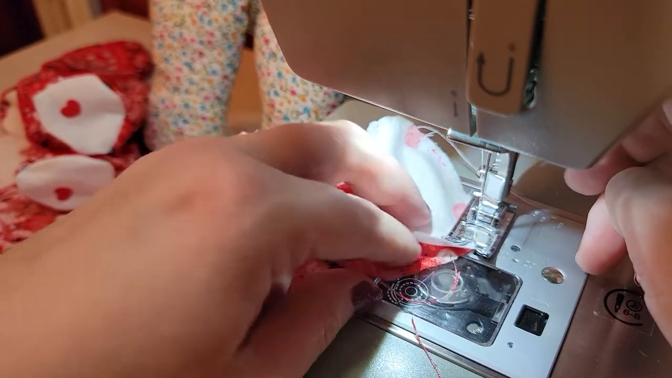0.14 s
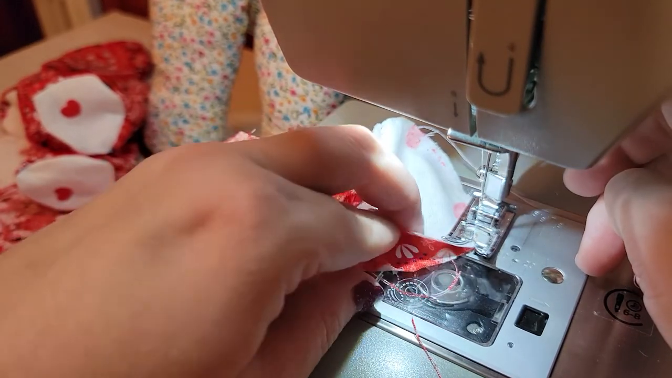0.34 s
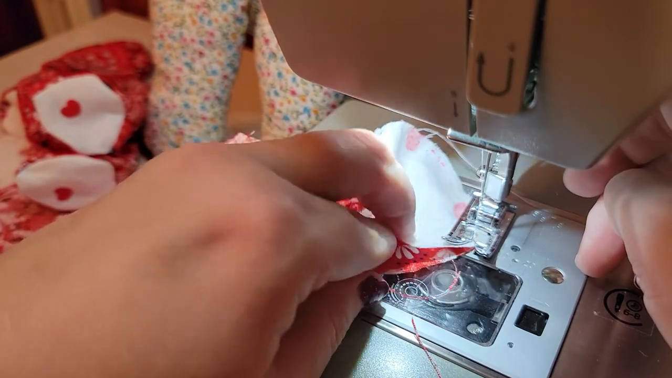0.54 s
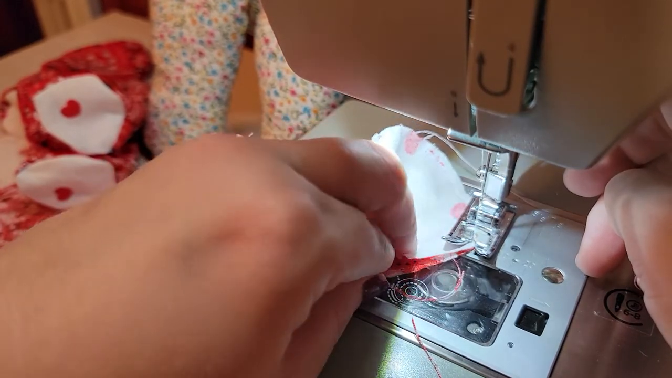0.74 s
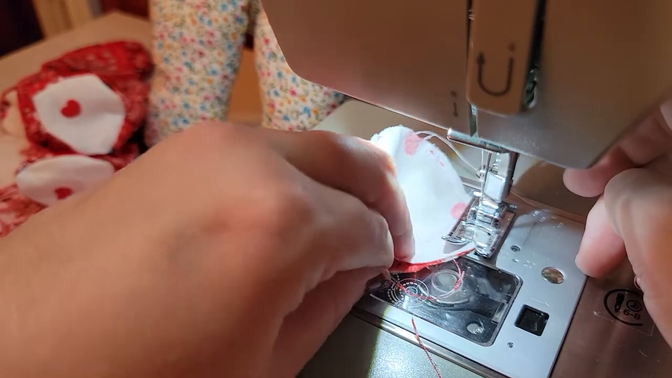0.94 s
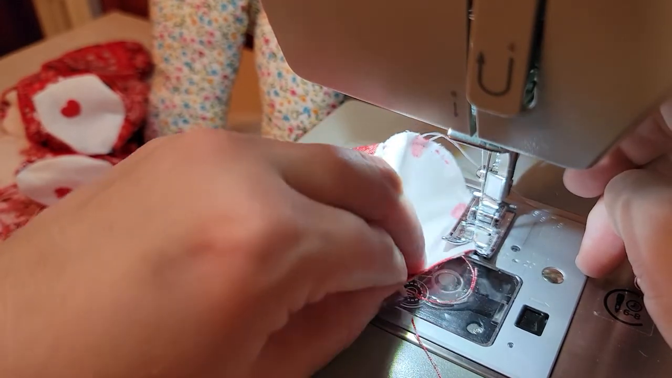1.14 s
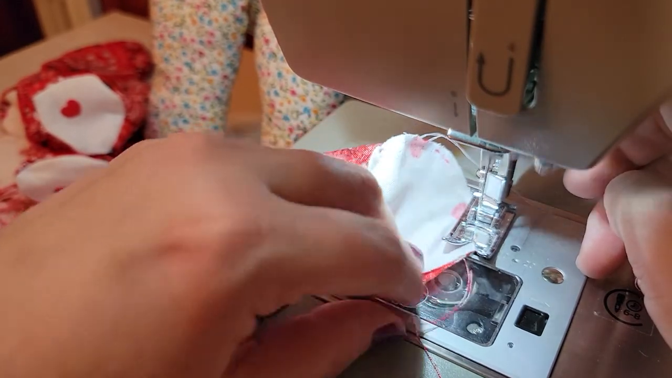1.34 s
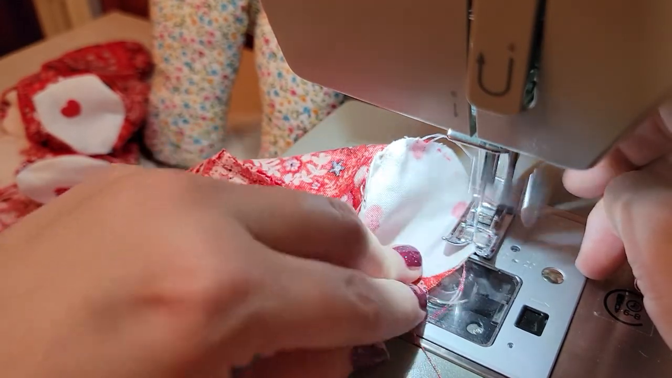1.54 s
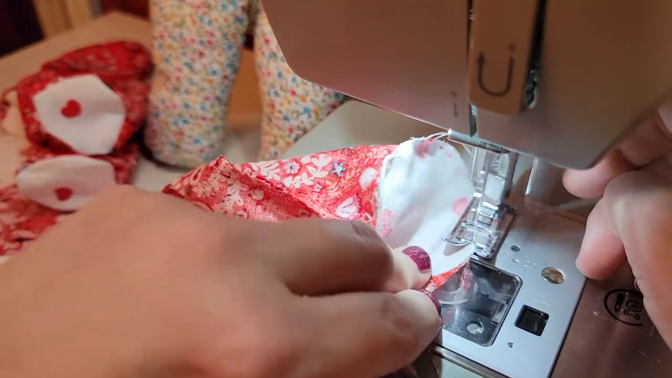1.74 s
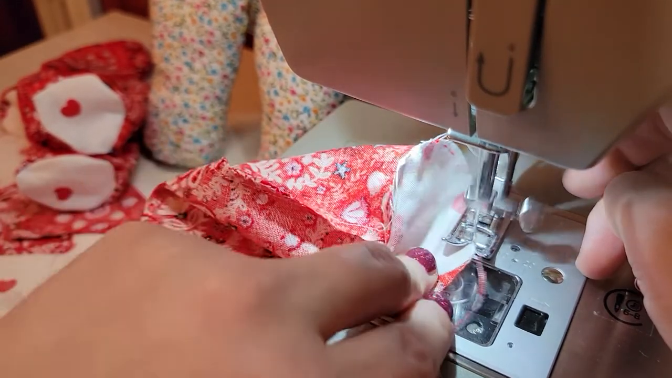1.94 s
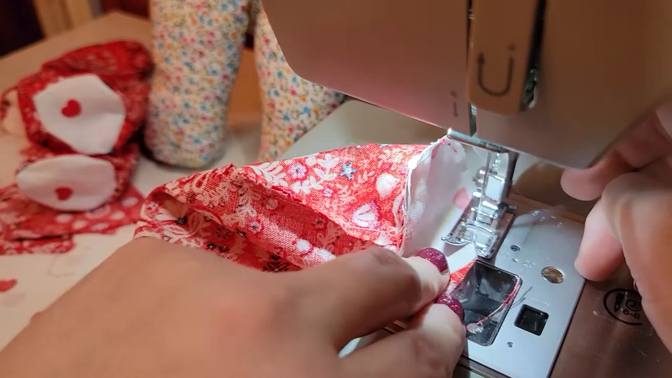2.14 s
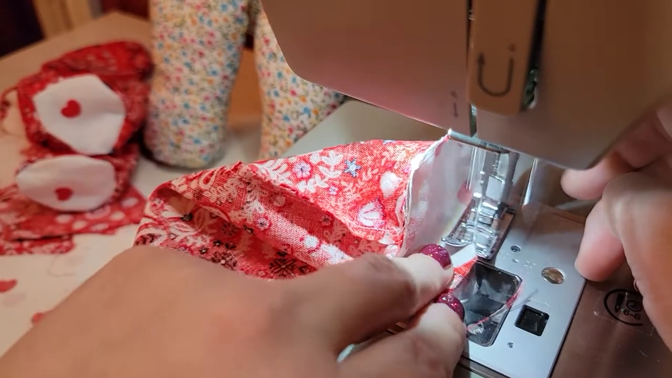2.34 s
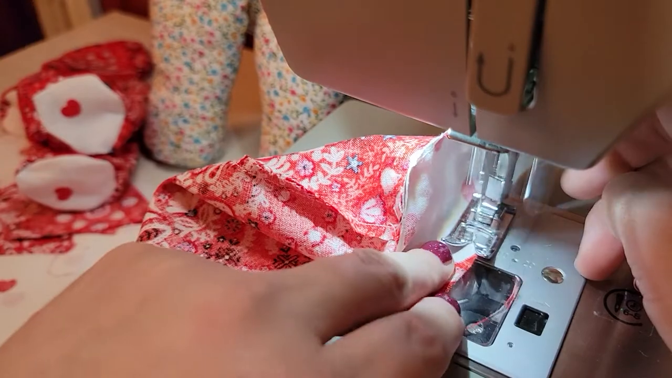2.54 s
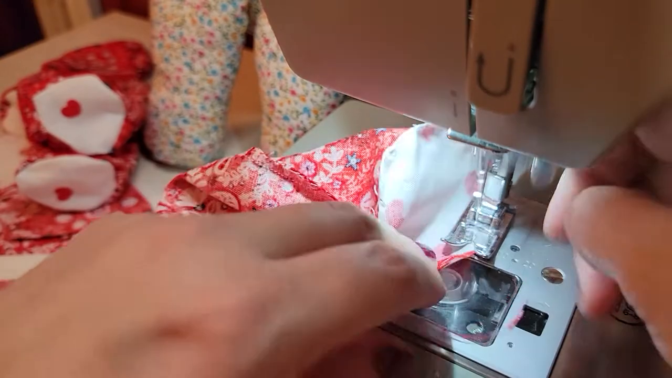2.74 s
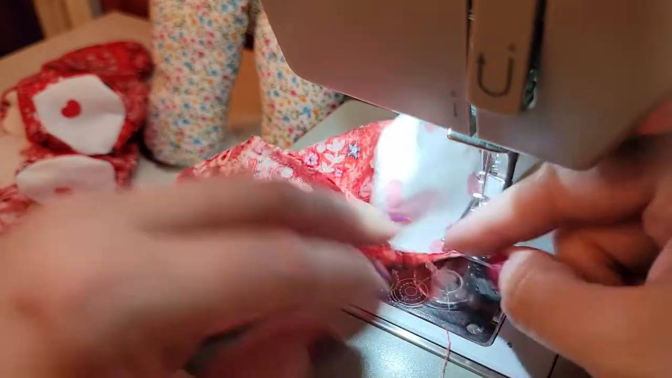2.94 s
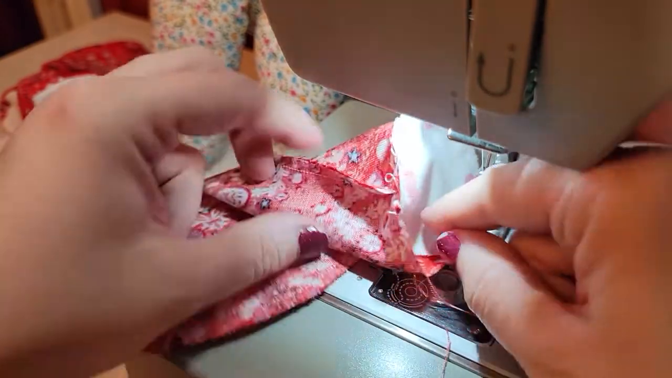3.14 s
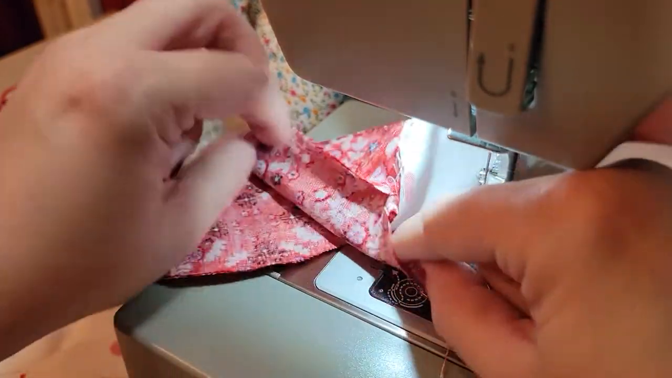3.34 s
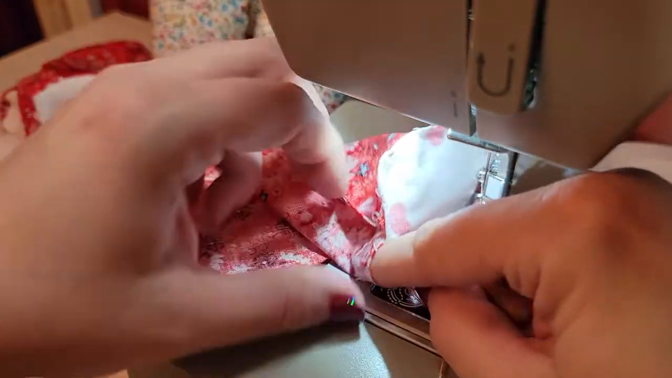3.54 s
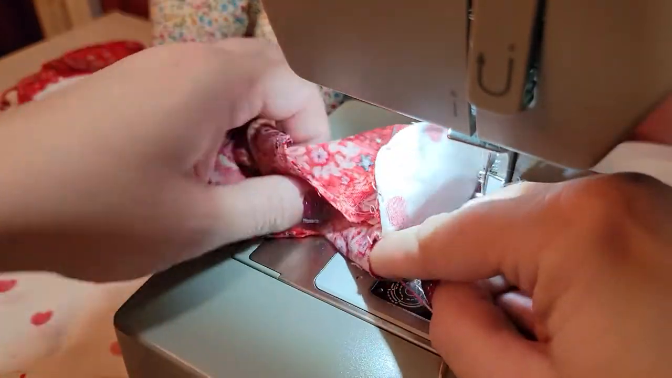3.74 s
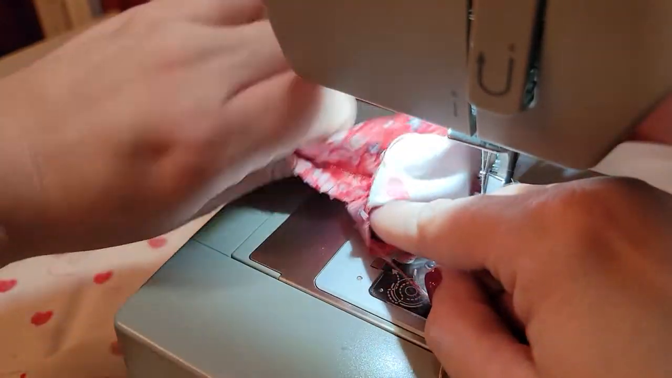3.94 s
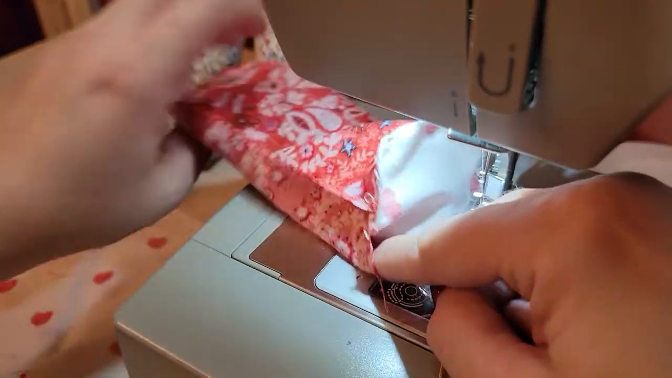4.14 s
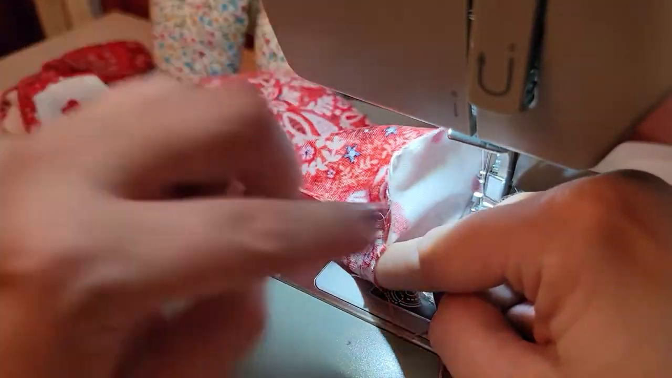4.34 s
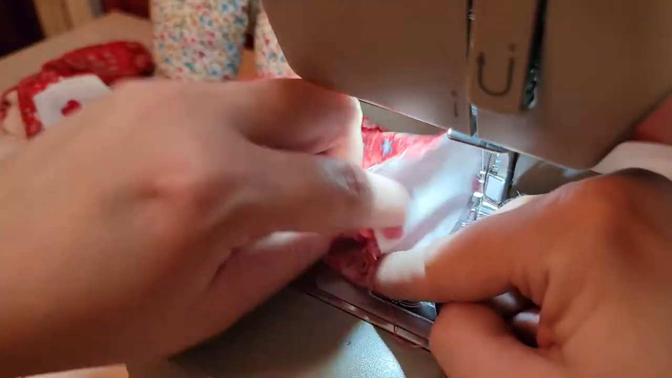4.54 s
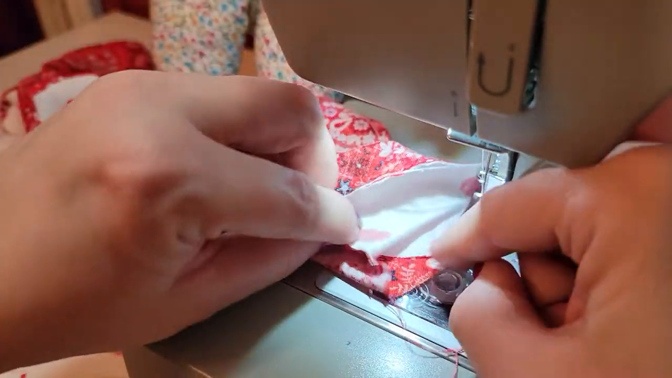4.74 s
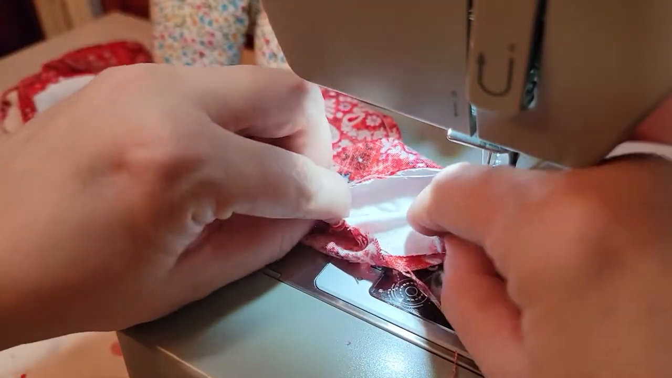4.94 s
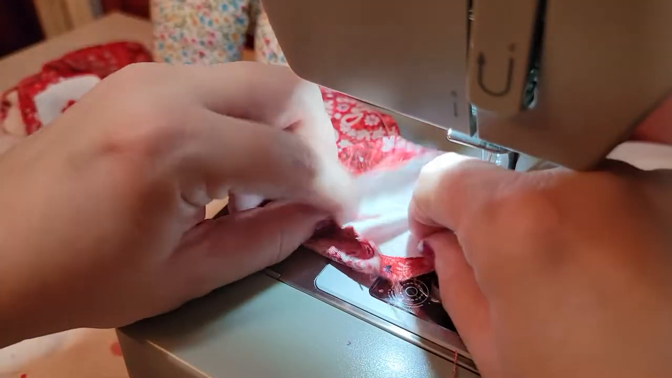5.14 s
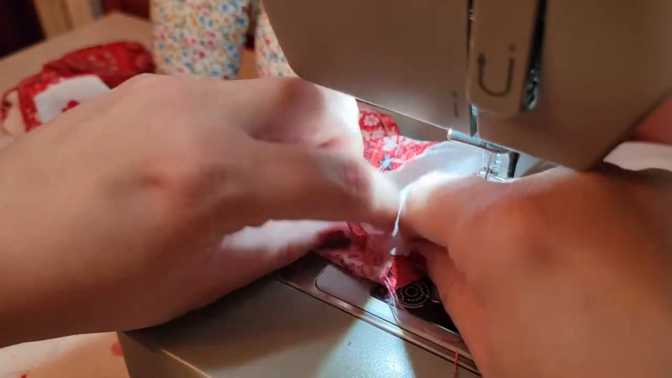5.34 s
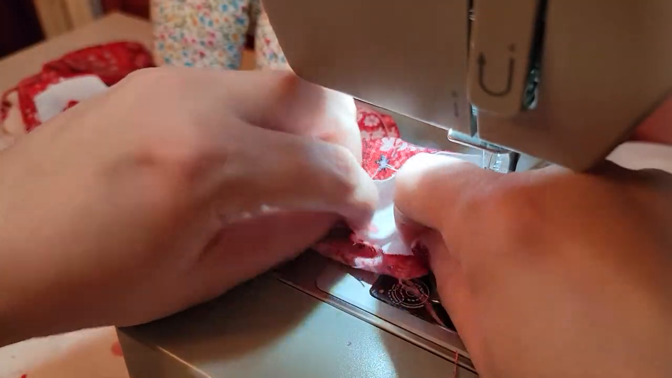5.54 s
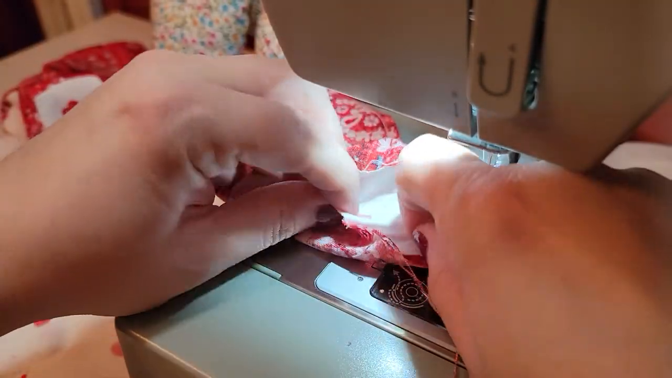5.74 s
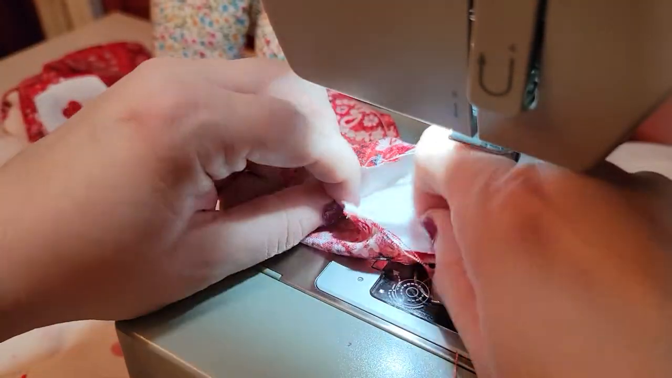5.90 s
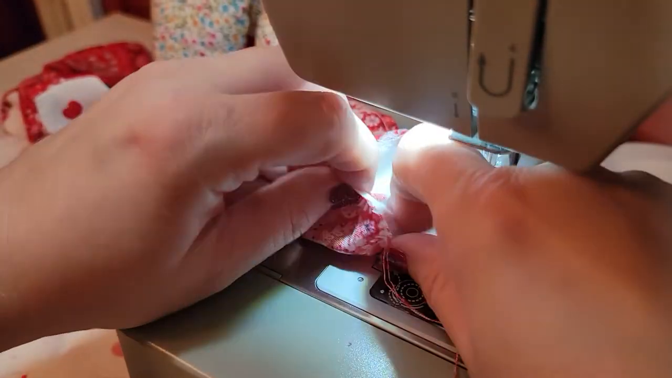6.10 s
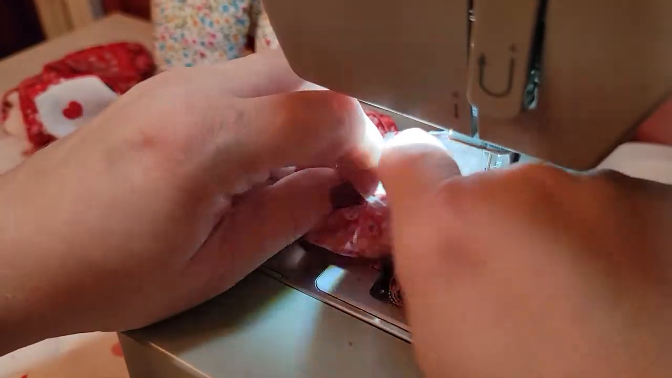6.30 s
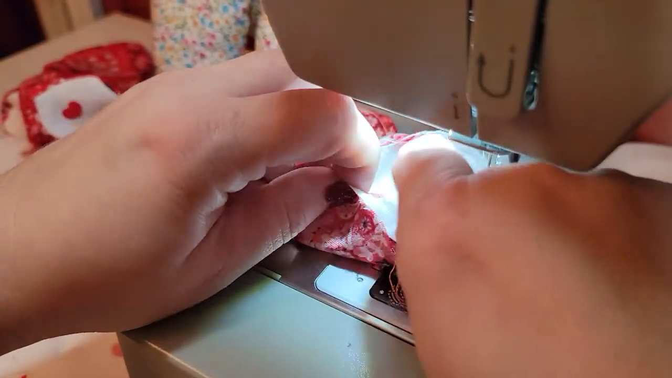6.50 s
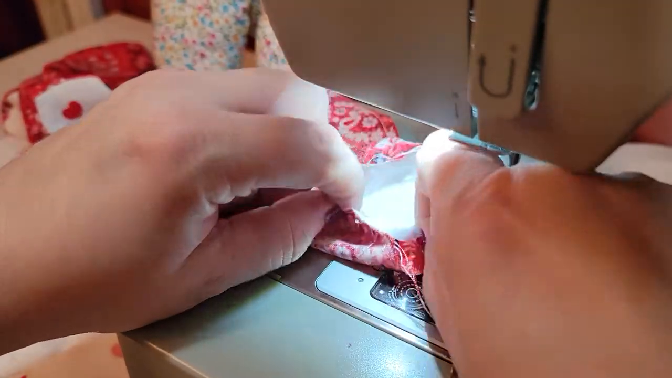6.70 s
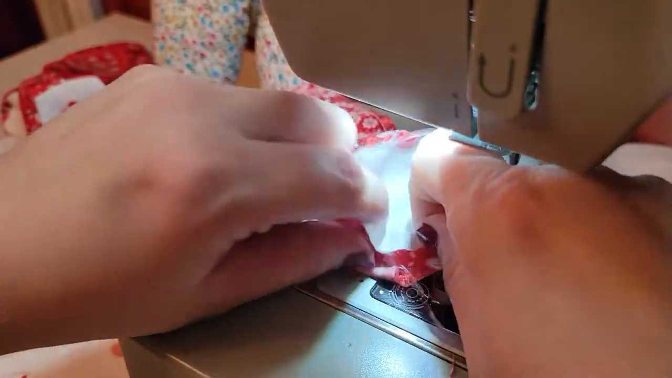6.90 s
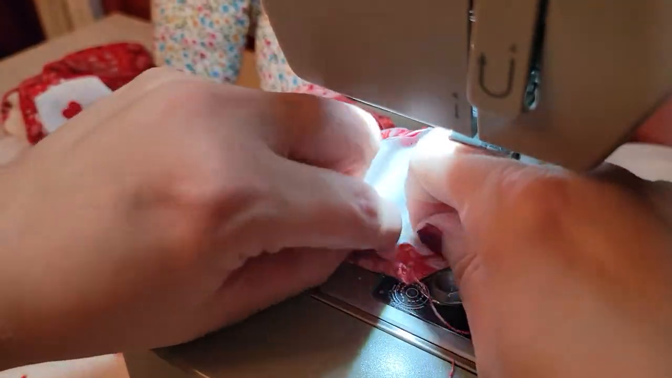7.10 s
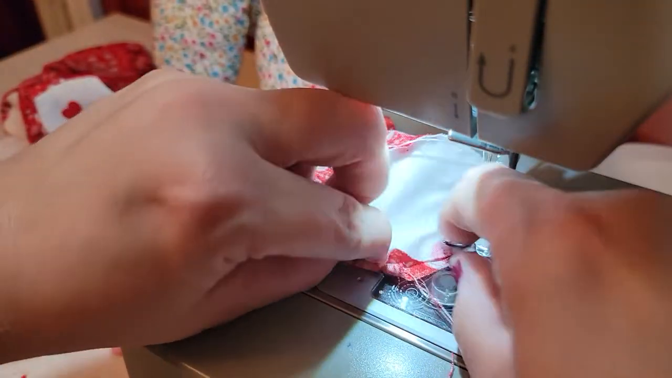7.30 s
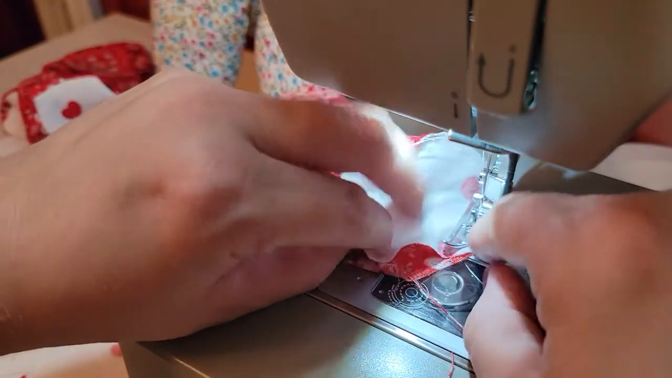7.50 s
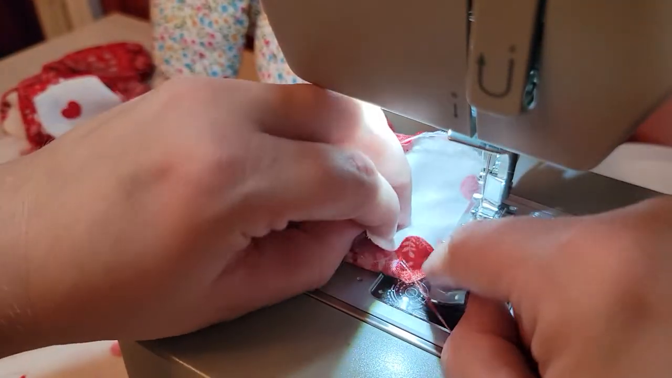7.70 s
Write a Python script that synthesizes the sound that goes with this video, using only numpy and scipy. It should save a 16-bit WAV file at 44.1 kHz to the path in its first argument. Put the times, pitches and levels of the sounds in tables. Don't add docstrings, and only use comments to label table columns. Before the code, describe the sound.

Close up in a quiet, faintly humming room, fingertips rustle and tap fabric on a metal bed. A domestic sewing machine buzzes, catches and races through about a dozen and a half stitches, its whine rising over rapid knocks, then coasts to a stop. The presser lever snaps sharply, and light cloth rustles, nail taps, soft thumps and tiny pin-like ticks continue to the end. A phone on the table picks it up nearby.

```python
import sys
import numpy as np
from scipy import signal
from scipy.fft import rfft, irfft
from scipy.io import wavfile
from scipy.ndimage import uniform_filter1d

SR = 44100
rng = np.random.default_rng(int(sys.argv[2]) if len(sys.argv) > 2 else 0)


def invert_db(level):
    return 10 ** (np.asarray(level, dtype=float) / 20)


def store_pcm(level_fs):
    pcm = np.round(np.clip(level_fs, -1, 1) * 32767).astype(np.int16)
    wavfile.write(sys.argv[1], SR, np.atleast_2d(pcm).T)


N = 346626
T, HZ = np.arange(N) / SR, np.fft.rfftfreq(N, 1 / SR)

# f/Hz, density/dB per Hz
ROOM_SPECTRUM = [(12, -48), (20, -31), (60, 3.5), (89, 7.5), (165, -10.5), (206, -41), (361, -8),
                 (652, -37.5), (750, -19), (1050, -51), (1320, -25.5), (3520, -37), (8410, -48),
                 (14300, -47.5), (16500, -50.5)]
ROOM_DB = -54.5
# start t/s, end t/s, f/Hz, level/dB
WHISTLES = [(.15, .65, 1670, -74), (.95, 1.37, 1690, -68), (.76, .84, 2250, -68), (3.19, 3.33, 2220, -71),
            (4.005, 4.035, 6000, -66), (4.7, 4.8, 3400, -70), (4.01, 4.03, 2100, -62),
            (5.37, 5.46, 2080, -68)]

# peak t/s, swell/s, fade/s, peak level/dB, fine hiss re peak/dB
RUSTLE = [(0.01, .02, 0.091, -73, -9), (0.1, .03, 0.45, -68.5, -15), (0.8, .6, 0.39, -70, -15),
          (1.212, .3, 0.065, -69.5, -5.5), (3.13, .02, 0.2, -61, -25), (3.39, 0.39, 0.16, -60.5, -4),
          (3.809, .25, 0.1, -51.5, -4.5), (4.05, .2, 0.47, -59.5, -5.5), (4.66, 0.1, 0.21, -68, -2.5),
          (4.97, 0.32, 0.068, -68.5, -7), (5.3, 0.45, 1, -70, -11), (6.05, 0.015, 0.14, -76.5, -1.5),
          (6.43, 0.32, 0.058, -69, -2), (7.539, .9, 0.039, -66.5, -9.5), (7.66, 0.18, 0.17, -66, -22)]
SLIDE_SPAN_DB = 20
REST_LOW_DB, REST_MID_DB, LOW_PER_SLIDE = -71, -80.5, .4
# t/s, peak level/dB, f/Hz, bright part re peak/dB, bright f/Hz
TAPS = [(0.091, -41, 371, -8.5, 1180), (0.136, -41, 364, -4, 1410), (0.618, -51, 357, -14, 1140),
        (1.106, -50.5, 826, -14, 1550), (1.19, -51, 450, 4, 1195), (3.098, -38.5, 399, 3.5, 1204),
        (3.402, -48, 472, 0, 1246), (3.64, -42.5, 532, -6, 1630), (3.687, -51.5, 368, 3.5, 1500),
        (5.178, -51.5, 359, 0, 1740), (5.207, -54.5, 382, -12, 2230), (5.261, -47.5, 855, 3.5, 3340),
        (5.893, -37, 347, -20, 1540), (5.984, -45, 358, -12.5, 980), (6.149, -67.5, 426, 11, 1510),
        (6.326, -46, 310, -10, 1296), (6.529, -54.5, 288, -13, 2060), (6.633, -62, 400, -3, 1040),
        (6.718, -57.5, 252, -3.5, 1467), (7.183, -57, 382, -8, 1410), (7.298, -42.5, 369, -9.5, 1230),
        (7.488, -34.5, 561, -6, 1584), (7.54, -63, 358, 4, 1930)]
# t/s, peak level/dB, f/Hz, left minus right/dB
TICKS = [(0.0915, -35.5, 5800, 9), (0.1367, -33, 5650, 11), (1.1918, -55, 5050, 3.0),
         (1.761, -3.5, 4800, 0), (3.1065, -20, 6040, 6), (3.4738, -67, 5040, -0.5),
         (3.5977, -46, 10450, 18), (3.6381, -66, 5110, 11), (4.0774, -31, 12000, 16),
         (4.198, -32, 5960, 13.5), (4.5007, -58.5, 13760, 16), (5.177, -56, 5870, 4),
         (5.2599, -41, 5700, 6), (5.6101, -46, 11080, 2), (5.983, -45, 5000, 17), (6.0414, -44, 12800, 19),
         (7.2995, -51, 5440, 14), (7.4864, -52, 5740, 4.5)]
# t/s, peak level/dB, f/Hz
THUMPS = [(0.488, -55, 364), (0.716, -46, 364), (0.876, -46.5, 337), (1.018, -51, 705), (1.281, -43, 651),
          (3.995, -33.5, 338), (4.057, -43.5, 281), (4.587, -43.5, 282), (4.763, -47.5, 313.6),
          (5.408, -54.5, 354), (6.372, -43.5, 365), (4.17, -56.5, 300), (5.521, -53, 331), (5.76, -48, 393),
          (6.205, -54.5, 650), (6.984, -50, 404), (7.276, -46.5, 365), (7.621, -50, 397), (7.68, -49, 530)]
THUMP_PAN_DB, TAP_PAN_DB, LEVER_PAN_DB = -5.5, -2.5, -4
# start t/s, end t/s, low level/dB, middle level/dB
RUBS = [(0.736, 0.844, -56.5, -78), (3.982, 4.025, -48, -79), (4.847, 4.912, -55.5, -73.5),
        (5.593, 5.718, -50.5, -65.5), (5.765, 5.815, -68, -90), (6.377, 6.475, -51.5, -66),
        (7.305, 7.41, -69.5, -73)]
# t/s, peak level/dB
LEVER = [
    (3.783, -24),
    (3.795, -12),
]
# f/Hz, level/dB, t60/s
LEVER_MODES = [(146.4, -7, 0.25), (368, 1.5, 0.14), (1082, -10.5, 0.1), (1550, -1, 0.092),
               (1780, -21, 0.16), (2210, -24.5, 0.17), (2410, -23, 0.18), (2520, -17, 0.13),
               (2730, -20.5, 0.18), (3024, -8.5, 0.083), (3671, -15, 0.08), (4350, -75, 0.22)]

# t/s, level/dB
DRIVE = [
    (1.262, -36),
    (1.282, -19.5),
    (1.372, -17),
    (1.5, -1),
    (2.64, 0),
    (2.904, -6.5),
    (3.074, -20),
    (3.126, -21.5),
    (3.17, -45),
]
# t/s, tooth rate f/Hz, motor effort level/dB
WHINE = [
    (1.47, 304.6, 3.5),
    (1.604, 611.3, 2),
    (1.778, 850, -0.5),
    (1.982, 980.6, 6),
    (2.372, 1043, 0.5),
    (2.59, 1061, 0.5),
    (2.764, 648, 1),
    (2.956, 311, -4.5),
    (3.03, 262.4, -0.5),
]
# multiple, level/dB
TOOTH_ORDERS = [(1, -15.5), (2, -30.5), (2.39, -31), (3, -31.5), (4, -30)]
# f/Hz, width/Hz, level/dB
OUTLETS = [(345, 150, -8), (590, 230, -10), (780, 170, 0), (900, 110, -7), (2050, 280, .5), (2430, 200, -6),
           (2900, 600, -11), (3600, 800, 1), (4200, 600, -3)]
# needle t/s, peak level/dB, feed t/s, peak level/dB
STITCH = [(1.31, -30.5, 1.402, -27), (1.491, -14, 1.573, -18.5), (1.627, -14.5, 1.713, -10.5),
          (1.763, -16, 1.81, -31.5), (1.87, -14.5, 1.906, -13.5), (1.96, -10.5, 1.994, -19),
          (2.049, -15, 2.083, -10.5), (2.135, -9, 2.166, -16), (2.217, -12.5, 2.25, -11.5),
          (2.301, -10, 2.332, -11.5), (2.383, -9, 2.416, -13.5), (2.466, -10, 2.498, -14),
          (2.546, -16, 2.576, -12.5), (2.631, -27.5, 2.686, -17.5), (2.735, -30.5, 2.809, -22.5),
          (2.872, -26.5, 2.903, -19.5)]
# share of turn, width/turn, thread drag/dB, casing rattle/dB, belt load/dB
DRAG = [
    (0, .05, 7.5, 2, -14.5),
    (.45, 0.055, -3, 3.5, -11),
    (.62, 0.072, 6, 1.5, -0.5),
    (.78, .035, 8, -3.5, 3),
    (0.881, .05, 4.5, 3.5, -3),
]
DRAG_DB, RATTLE_DB, LOAD_DB = -4.5, -2, 3.5
# full-speed level/dB, dB per dB of drive, dB per dB of speed
FOLLOWS = [
    (-30.5, 1, 0.82),
    (-23.5, 1, 0.32),
    (-23.5, 1.29, .5),
    (-39, 0.74, 1.09),
]
# f/Hz, width/Hz, level/dB
CASING = [(277, 18, -7.5), (382, 22, 5), (531.5, 9.6, -2), (630, 11, -9), (784, 56, -3), (860, 90, -7.5)]
# f/Hz, density/dB per Hz
GRIND = [(590, -30.5), (1000, 0), (1310, 0), (1430, -3.5), (1640, -4.5), (2070, -3.5), (2230, -7),
         (2650, -8.5), (3910, -4), (5400, -18.5), (6000, -25.5), (7800, -48), (13200, -120)]
# f/Hz, density/dB per Hz
HISS = [(2940, -35), (5000, -4), (6580, -8), (7490, -4.5), (8970, -13.5), (10600, -10.5), (15200, -5.5),
        (16100, -9), (16500, -57)]
TUG_HZ, TABLE_HZ = 119.3, 107.3
FULL_HZ, REST_S = 1050, 3.16
KNOCK_HZ, KNOCK_RISE_HZ, KNOCK_SCATTER = 556, 300, 0.022
NEEDLE_CLATTER_DB, FEED_CLATTER_DB, CLATTER_PER_SPEED = -5.5, -14.5, 1.5
STOP_S, STOP_DB, STOP_T60_S = 3.095, -26.5, 0.098
TURNS_S, BREAKAWAY_S, HELD_DB = 1.48, 0.089, -15

# f/Hz, left minus right/dB
TILT = [(60, -1.0), (110, 0.11), (200, -2.0), (380, -5.0), (700, -8.5), (1290, -3.5), (2380, -3.5),
        (4400, -3.5), (8120, 1.49), (15000, -2.0)]
HANDS_TILT = [(150, -0.5), (400, 0.58)]  # f/Hz, left minus right/dB
# f/Hz, lead/rad
LEAD = [(60, .1), (170, .05), (330, -1.7), (1000, -1.9), (2000, -4.7), (5000, -11.5), (16000, -20)]
# f/Hz, share 0-1
SHARED = [(60, 0.83), (150, .9), (300, 0.068), (1000, 0.11), (6000, 0.11), (16000, 0.27)]
TOP_HZ = 16050


def shape(table):
    hz, value = np.transpose(table)
    return np.interp(np.log(HZ + 1), np.log(hz), value)


def unit(x):
    return x / np.sqrt(np.mean(x ** 2))


def band(lo_hz, hi_hz):
    return 1 / np.sqrt((1 + (lo_hz / (HZ + 1)) ** 6) * (1 + (HZ / hi_hz) ** 6))


def peak(hz, width_hz):
    return 1 / np.sqrt(1 + (2 * (HZ - hz) / width_hz) ** 2)


def noise(gain):
    both, own = rfft(rng.standard_normal((2, N)))
    shared = np.clip(shape(SHARED), 0, 1)
    left = shared * both + np.sqrt(1 - shared ** 2) * own
    return unit(irfft(gain * np.array([left, both]), N))


def walk(rate_hz):
    k = int(SR / rate_hz)
    held = np.repeat(rng.standard_normal(N // k + 1), k)
    return 1.46 * uniform_filter1d(uniform_filter1d(held, k), k)[:N]


def strike(s, t60_s, rise_s=.001):
    t = np.clip(T[:SR // 4] - s, 0, None)
    return (1 - np.exp(-t / rise_s)) * np.exp(-np.log(1000) * t / t60_s)


def ring(hz, t60_s, rough, rise_s=0.00044):
    t = T[:SR // 4]
    jitter = uniform_filter1d(rng.standard_normal((2, len(t))), size=40)
    both, own = np.cumsum(jitter, axis=1) * rough
    phase = 2 * np.pi * hz * t + np.array([both + 0.6 * own, both])
    return np.sin(phase) * strike(0, t60_s, rise_s)


def burst(source, s, t60_s, rise_s=0.0002):
    piece = source[:, (int(s * SR) + np.arange(SR // 4)) % N]
    return piece * strike(0, t60_s, rise_s) / 2


def add(out, s, db, sound, pan_db=0):
    i = int(s * SR)
    sound = sound[..., :N - i]
    out[:, i:i + sound.shape[-1]] += sound * invert_db(db + np.array([[pan_db], [-pan_db]]) / 2)


def room():
    out = invert_db(ROOM_DB + 0.68 * walk(4)) * noise(invert_db(shape(ROOM_SPECTRUM)))
    for t0, t1, hz, db in WHISTLES:
        gate = np.clip(np.minimum(T - t0, t1 - T) / .02, 0, 1)
        out += gate * invert_db(db) * noise(peak(hz, .08 * hz) ** 2)
    return out


def crackle(rate_hz, spread_db):
    size_db = spread_db * np.minimum(rng.exponential(size=N), 3)
    hits = (rng.random(N) < rate_hz / SR) * invert_db(size_db)
    return unit(1.3 + signal.lfilter([1], [1, -.994], hits))


def slides():
    mid, fine = invert_db(REST_MID_DB) + 0 * T, 0
    for s, swell_s, fade_s, db, fine_db in RUSTLE:
        away_db = SLIDE_SPAN_DB * np.maximum((s - T) / swell_s, (T - s) / fade_s)
        mid = mid + invert_db(db - away_db)
        fine = fine + invert_db(db + fine_db - 1.5 * away_db)
    low = invert_db(REST_LOW_DB) * (mid / invert_db(REST_MID_DB)) ** LOW_PER_SLIDE
    return low, mid, fine


def rustle(low, mid):
    fine = noise(band(4500, 8300) + band(22000, 24000))
    low_gain, mid_gain, fine_gain = slides()
    grain = walk(30)
    out = low_gain * invert_db(-1.0 + 3.2 * grain + 2.5 * walk(45)) * low
    out += mid_gain * invert_db(-5.0 + 1.1 * grain + 0.58 * walk(98)) * crackle(140, 4.3) * mid
    out += fine_gain * invert_db(5.0 + 1.1 * walk(60)) * crackle(120, 3.5) * fine
    return out


def taps(out, low, mid):
    for s, db, hz, rel_db, bright_hz in TAPS:
        body = ring(hz, 0.115, 0.062) + 1.07 * burst(low, s, 0.105)
        bright = burst(mid, s, 0.055, rise_s=0.00045) + ring(bright_hz, 0.032, 0.22)
        add(out, s, db + 1.0, body, TAP_PAN_DB)
        add(out, s, db + rel_db + 5.5, bright, TAP_PAN_DB)


def ticks(out, air):
    for s, db, hz, pan_db in TICKS:
        snap = 0.55 * ring(hz, 0.012, 0.1, rise_s=.0002) + burst(air, s, 0.014)
        add(out, s, db - 12.5, snap, pan_db)


def thumps(out, low, mid):
    for s, db, hz in THUMPS:
        thump = ring(hz, 0.15, .06) + 0.6 * burst(low, s, 0.055) + 0.041 * burst(mid, s, .05)
        add(out, s, db + 1.5, thump, THUMP_PAN_DB)


def rubs(out, low, mid):
    for t0, t1, low_db, mid_db in RUBS:
        swell = np.sin(np.pi * np.clip((T - t0) / (t1 - t0), 0, 1)) * invert_db(2.0 * walk(70))
        out += swell * (invert_db(low_db) * low + invert_db(mid_db) * mid)


def lever(out, low, mid, air):
    for s, db in LEVER:
        modes = sum(invert_db(g) * ring(hz, t60_s, 0.041, rise_s=0.0033) for hz, g, t60_s in LEVER_MODES)
        clack = burst(mid + .3 * air + 1.24 * low, s, 0.044, rise_s=0.00069)
        tail = 0.18 * burst(mid + 0.086 * air, s, .18)
        add(out, s, db - 6.0, modes, LEVER_PAN_DB)
        add(out, s, db - 4.5, clack + tail, LEVER_PAN_DB)


def hands():
    low = noise(0.76 * peak(180, 25) + peak(350, 80) + 0.62 * band(380, 820))
    weave = peak(1300, 550) ** 2 + peak(2100, 520) ** 2 + 0.8 * peak(3400, 820) ** 2
    mid = noise(weave + 0.55 * peak(4400, 490) ** 2 + 0.058)
    air = noise(band(2600, 16000))
    out = rustle(low, mid)
    taps(out, low, mid)
    ticks(out, air)
    thumps(out, low, mid)
    rubs(out, low, mid)
    lever(out, low, mid, air)
    return out


def speed_db(s):
    when, hz, _ = np.transpose(WHINE)
    return 20 * np.log10(np.interp(s, when, hz) / FULL_HZ)


def motor_hum(gain, stall, tug):
    table = noise(peak(TABLE_HZ, 27) * band(66, 150))
    return gain * (2.4 * stall * tug + (1.1 - 0.39 * stall) * table)


def casing_rattle(gain, rattle_db, stall, tug):
    shell = sum(invert_db(db) * peak(hz, w_hz) for hz, w_hz, db in CASING) * band(150, 900)
    out = gain * invert_db(3.0 + rattle_db + 0.69 * walk(45)) * (1 - .5 * stall) * noise(shell)
    once = np.diff(np.sign(tug + 1e-9), prepend=1).clip(0)
    jolts = rfft(once * invert_db(4.5 * rng.standard_normal(N)))
    buzz = unit(irfft(jolts * (peak(370, 40) + 1.83 * peak(650, 90)) ** 2, N))
    return out + gain * 1.2 * stall * buzz


def brushes():
    gate = np.clip(np.minimum((T - 1.27) / 0.0088, (1.44 - T) / 0.1), 0, 1)
    fizz = (peak(2600, 110) + 0.6 * peak(3130, 150) + 0.5 * peak(2300, 110)) ** 2
    return invert_db(-57) * gate * noise(fizz)


def knocks(out, gears, thread):
    blows = [(s, db, NEEDLE_CLATTER_DB) for s, db, _, _ in STITCH]
    blows += [(s, db, FEED_CLATTER_DB) for _, _, s, db in STITCH]
    clatter = gears + 0.22 * thread
    for (s, db, clatter_db), chance in zip(blows, rng.standard_normal(len(blows))):
        hz = (KNOCK_HZ + KNOCK_RISE_HZ * invert_db(speed_db(s))) * (1 + KNOCK_SCATTER * chance)
        rel_db = clatter_db + CLATTER_PER_SPEED * speed_db(s)
        add(out, s, db + 5, ring(hz, 0.028, 0.09, rise_s=0.00079))
        add(out, s + .003, db - 2.5, ring(385., .08, .05, rise_s=0.006))
        add(out, s, db + rel_db + 1.0, burst(clatter, s, 0.026, rise_s=0.00074))


def whine(load_db, drive_db):
    s, hz, effort_db = np.transpose(WHINE)
    rate_hz = np.interp(T, s, hz)
    turn = 2 * np.pi * np.cumsum(rate_hz * (1 + .0022 * walk(50))) / SR
    out = 0
    for k, db in TOOTH_ORDERS:
        way_out = sum(invert_db(g) / (1 + (2 * (k * rate_hz - f) / w) ** 2) ** 2 for f, w, g in OUTLETS)
        swing = .9 if k == 2 else .4
        flutter = walk(35) + .5 * np.array([walk(30), walk(30)])
        flutter_db = (2.1 if k in (1, 4) else 3) * flutter
        order_db = db + (k > 1) * .33 * k * drive_db + swing * load_db + flutter_db
        out = out + way_out * invert_db(order_db) * np.sin(k * turn)
    slack = np.clip((s[-1] - T) / 0.067, 0, 1)
    effort = invert_db(np.interp(T, s, np.clip(effort_db, -30, 4), -140, -140))
    return out * slack * effort


def machine():
    drive_db = np.interp(T, *np.transpose(DRIVE), -300, -300)
    hum, casing, grind, hiss = (invert_db(db + a * drive_db + b * speed_db(T)) for db, a, b in FOLLOWS)
    turns = np.interp(T, [row[0] for row in STITCH] + [REST_S], np.arange(len(STITCH) + 1))
    near = [np.exp(-(((turns - at + .5) % 1 - .5) / width) ** 2) for at, width, *_ in DRAG]
    drag_db, rattle_db, load_db = np.transpose(DRAG)[2:] @ near + [[DRAG_DB], [RATTLE_DB], [LOAD_DB]]
    stall = np.clip((1.75 - T) / 0.27, 0, 1)
    tug = np.sin(2 * np.pi * TUG_HZ * T)
    held_db = HELD_DB * np.clip((TURNS_S - T) / BREAKAWAY_S, 0, 1)
    out = motor_hum(hum, stall, tug) + casing_rattle(casing, rattle_db, stall, tug) + brushes()

    mesh = 1 + 0.7 * peak(1390, 110) + 0.73 * peak(2060, 100) + .5 * peak(2800, 120)
    gears = noise(invert_db(shape(GRIND)) * band(900, 7000) * mesh)
    grit_db = np.clip(1.8 * walk(120), -5, 3)
    out += grind * invert_db(-1.0 + 0.46 * held_db + 0.46 * drag_db + grit_db) * gears
    thread = noise(invert_db(shape(HISS)) * band(3600, 12000))
    out += hiss * invert_db(5.0 + held_db + 1.3 * drag_db + 1.1 * walk(150)) * thread
    knocks(out, gears, thread)
    add(out, STOP_S, STOP_DB, burst(gears, STOP_S, STOP_T60_S, rise_s=0.0066))
    return out + whine(load_db, drive_db)


def ports(x, tilt_db):
    lean = invert_db(tilt_db / 2)
    edges = band(24, 1e6) / (1 + (HZ / TOP_HZ) ** 110)
    return irfft(rfft(x) * edges * np.array([lean * np.exp(1j * shape(LEAD)), 1 / lean]), N)


def scene():
    return ports(hands() + room(), shape(HANDS_TILT)) + ports(machine(), shape(TILT))


def low_pass(x):
    return signal.sosfilt(signal.butter(12, 16980, fs=SR, output="sos"), x)


def record(dry):
    return low_pass(dry)


dry = scene()
out = record(dry)
store_pcm(out)
```